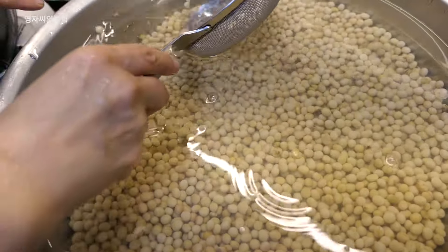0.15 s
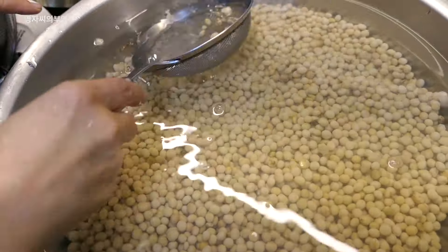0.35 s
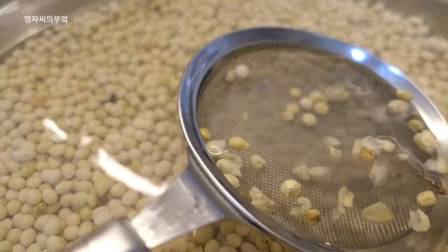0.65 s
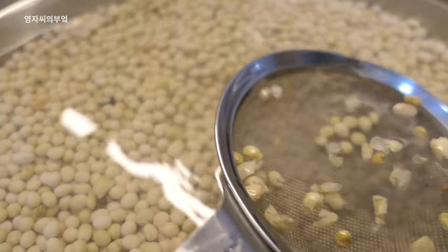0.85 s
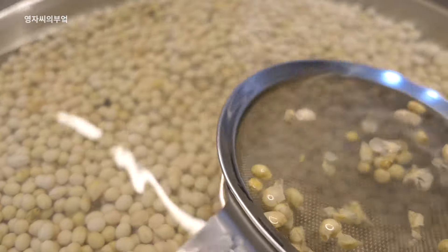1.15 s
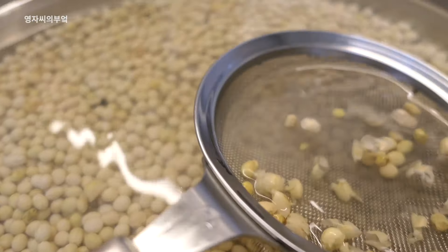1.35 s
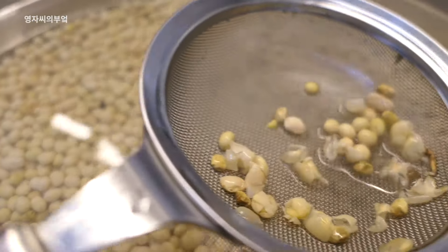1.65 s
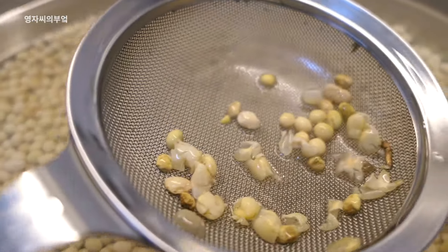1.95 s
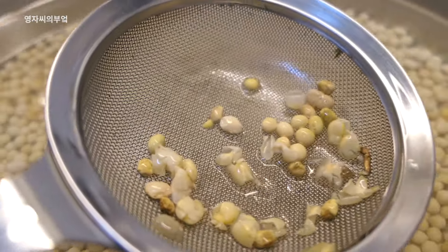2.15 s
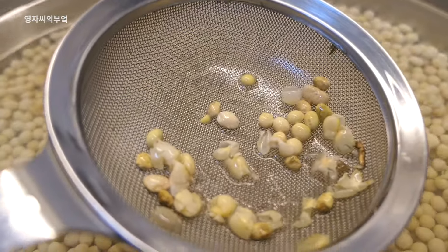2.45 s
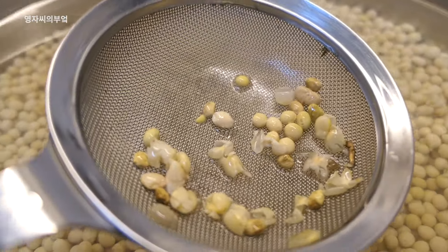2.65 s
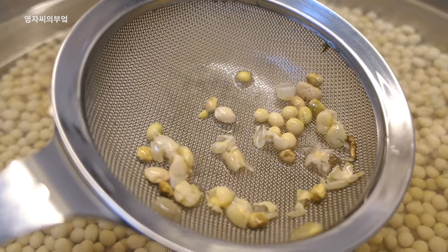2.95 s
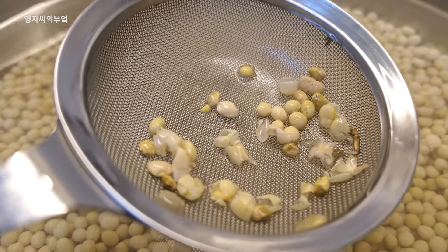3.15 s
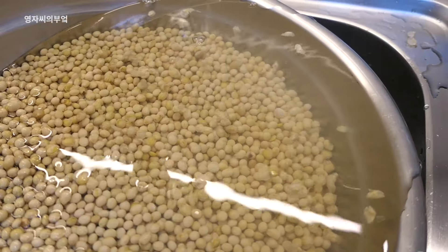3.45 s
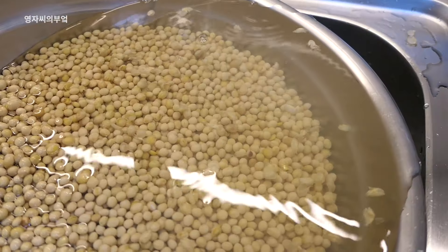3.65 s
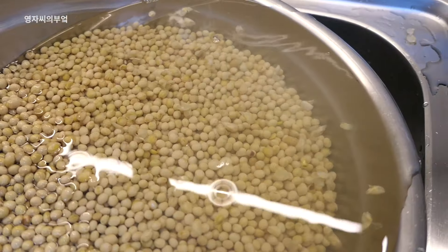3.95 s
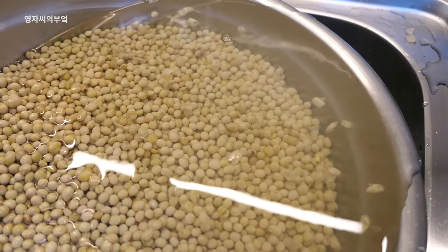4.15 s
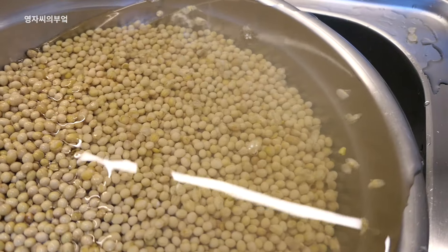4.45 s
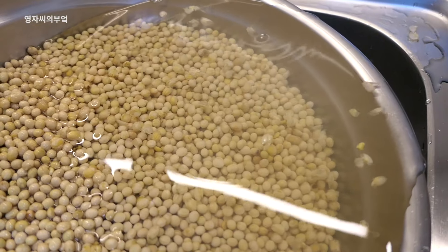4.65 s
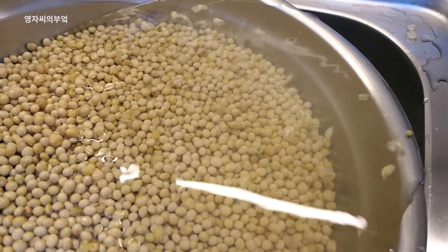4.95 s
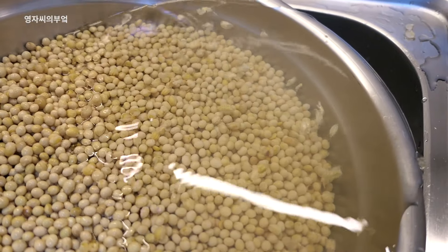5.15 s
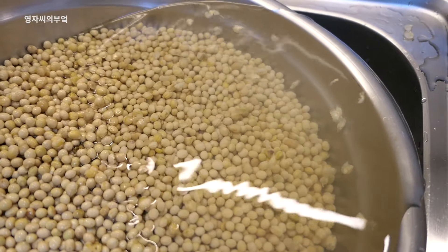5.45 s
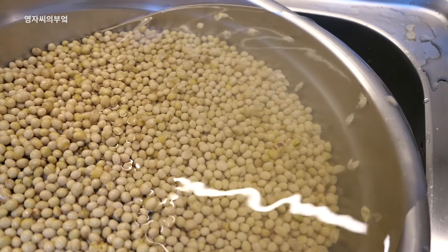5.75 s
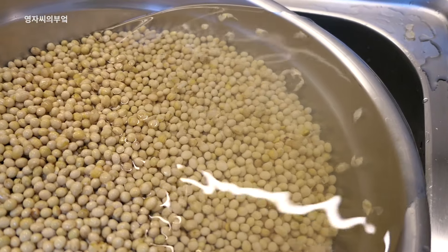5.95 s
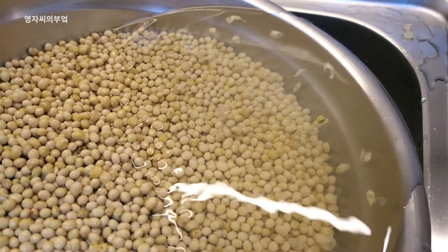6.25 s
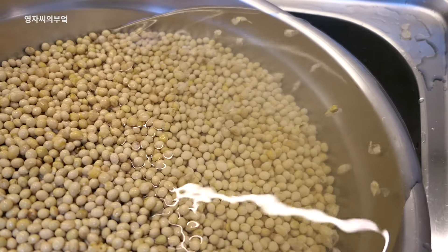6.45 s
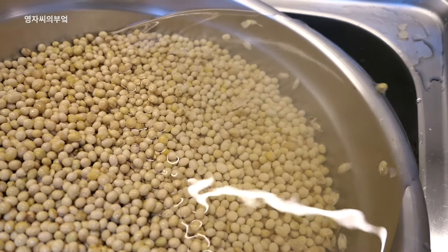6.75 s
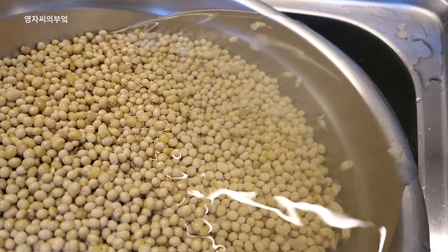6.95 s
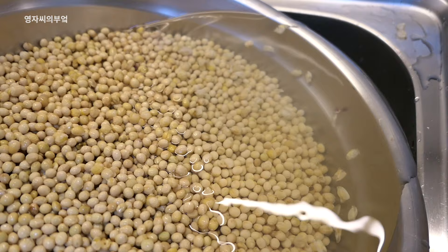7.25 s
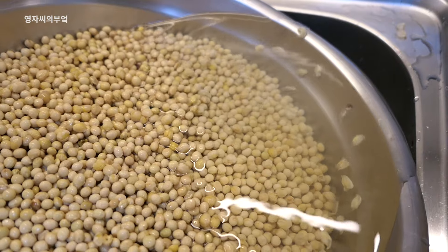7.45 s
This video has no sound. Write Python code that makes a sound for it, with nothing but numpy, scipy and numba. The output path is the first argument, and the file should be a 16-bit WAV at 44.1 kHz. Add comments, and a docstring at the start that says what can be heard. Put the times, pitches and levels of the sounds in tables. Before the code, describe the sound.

Quiet trickling and single drips come first, with an early clank of a strainer against a water-filled steel bowl and two muffled far-off slaps in the room. The sound cuts to silence for a moment, then a much louder tap stream starts abruptly, all bubbles, spray and hollow gurgle in the sink, with the bowl thrumming beneath. Close stereo microphone, soft kitchen air.

```python
"""Water trickles and drips as a wire strainer skims beans soaking in a steel bowl. Its rim clanks once on the
bowl, and two dull slaps sound further off in the kitchen. After a short silence, tap water runs into the bowl in
the sink: fizz, gurgles and large bubbles, coloured by the sink's hollow, with the steel drumming below.
Bubbles, drops and ringing steel are fading sine waves; hiss, slaps, drumming and room air are shaped noise."""
import sys
import numpy as np
from scipy import signal
from scipy.fft import rfft, irfft, next_fast_len
from scipy.io import wavfile
from scipy.ndimage import uniform_filter1d
from numba import njit

SR = 44100
rng = np.random.default_rng(int(sys.argv[2]) if len(sys.argv) > 2 else 0)


def to_linear_factor(level_db):
    """Convert decibel levels (scalar or array-like) to linear amplitude factors."""
    exponent = np.asarray(level_db, float) / 20
    return 10 ** exponent


def transcribe(u):
    """Save the signal u as a 16-bit wav file named by the first command-line argument.

    u: samples, shape (n,) or (channels, n), limited to [-1, 1]; the rate is SR.
    q: integer samples, one column per channel.
    """
    v = np.clip(np.atleast_2d(u).T, -1, 1)
    q = np.round(v * 32767).astype(np.int16)
    wavfile.write(sys.argv[1], SR, q)


N = 335406
TIME = np.arange(N) / SR  # seconds

# When the clank part ends, the skimming ends and the tap part begins [t/s]
CUTS = (.454, 3.320, 3.508)

# How hard the stream strikes the surface [t/s, fizz level/dB]
FLOW_LEVELS = [(3.51, -29.5), (4.03, -30), (4.18, -26), (4.28, -32), (4.42, -30.5), (4.55, -28.5),
               (5.1, -29), (5.28, -32), (5.42, -28.5), (5.62, -29.5), (5.86, -30.5), (6.0, -32), (6.3, -31),
               (6.7, -33), (6.98, -31.5), (7.18, -33.5), (7.33, -32.5), (7.61, -34)]
# Colour of the fizz and spray [f/Hz, gain/dB]
FIZZ_COLOUR = [(880, -13), (1500, -8), (1810, -13), (2100, -3.5), (2690, -7.5), (2910, -5), (9370, -10),
               (14800, -21.5), (16000, -23)]
# Bright spurts of spray [t/s, level against the steady spray/dB]
SPRAY_SPURTS = [(4.155, 5), (4.53, 7), (4.641, 6.2), (5.42, 13), (5.901, 4.5), (6.716, 8.6), (7.275, 17.5),
                (7.391, 13)]
SPURT_S = 0.019  # time to rise or fall by 20 dB
# Colour of the gurgles [f/Hz, gain/dB]
GURGLE_COLOUR = [(400, -56), (600, -14), (800, -3.5), (1050, -4.5), (2000, -4), (3000, -8), (4500, -11)]
# Deeper water turns fizz into gurgle until the level settles; the start is set against the fizz
GURGLE_START_DB, GURGLE_GAIN_DB_PER_S, SETTLED_S = -13.5, 6, 6.06
# Clearest large bubbles and plunges under the stream [t/s, relative level/dB, f/Hz]
LARGE_BUBBLES = [(3.552, -24, 4360), (3.608, -20, 2430), (3.772, -18, 2500), (3.821, -17.5, 1970),
                 (3.89, -14.5, 2030), (3.927, -12, 6300), (3.963, -14.5, 3340), (4.046, -18.5, 1110),
                 (4.18, -10.5, 3290), (4.391, -19, 1476), (4.445, -15.5, 6530), (4.483, -12.5, 5480),
                 (4.565, -14.5, 2250), (4.684, -13.5, 1350), (4.788, -16.5, 3200), (4.898, -9.5, 2106),
                 (5.01, -13.5, 1452), (5.065, -11.5, 2370), (5.135, -9.5, 2805), (5.208, -10.5, 1350),
                 (5.304, -13, 2040), (5.397, -11.5, 1890), (5.533, -15.5, 1266), (5.561, -12, 3490),
                 (5.603, -11, 2185), (5.63, -7, 1367), (5.72, -9, 3360), (5.739, -15, 844),
                 (5.81, -16, 900), (5.823, -14.5, 2540), (5.847, -10, 2120), (5.862, -8, 1302),
                 (5.971, -14.5, 890), (6.073, -11.5, 850), (6.194, -14.5, 2170), (6.339, -19.5, 1430),
                 (6.469, -13.5, 2410), (6.529, -14.5, 1590), (6.579, -11.5, 1397), (6.664, -16.5, 2500),
                 (6.835, -12, 1320), (6.945, -10, 2180), (6.989, -14.5, 3030), (7.044, -9, 1340),
                 (7.062, -17, 2485), (7.13, -13, 3470), (7.177, -16.5, 2156), (7.243, -16, 1350),
                 (7.366, -7.5, 2037), (7.549, -14.5, 2860)]
# Resonances of the air in the sink [f/Hz, width/Hz, gain/dB]
SINK_HOLLOW = [(850, 35, -3), (1350, 100, 3.5), (2070, 71, 2), (2523, 114, 1.5), (2860, 87, -1.5)]
# Resonances of the steel under the stream [f/Hz, width/Hz, gain/dB]
STEEL = [(285, 80, 6.5), (349, 13, 10), (425, 50, -5)]
# The steel drums harder as the bowl grows heavy
DRUM_START_DB, DRUM_GAIN_DB_PER_S = -41.5, 1.13
THRUM_START_DB, THRUM_GAIN_DB_PER_S = -56, 1.4
# Swells of the drumming [loudest t/s, level/dB, 20 dB rise/s, 20 dB fall/s]
DRUMMING_SWELLS = [(5.03, -35, 0.27, 0.17), (5.73, -31.5, 0.52, 0.24), (6.95, -31, 0.092, 0.085)]
# Swells of the low thrum [loudest t/s, level/dB, 20 dB rise/s, 20 dB fall/s]
LOW_THRUM_SWELLS = [(5.73, -48, 0.4, 0.31), (6.11, -39, 0.058, 0.15), (6.57, -36, 0.29, 0.81),
                    (6.95, -35.5, .1, 0.1), (7.52, -42.5, 0.81, 0.099)]
SMACK_DB, SMACK_T60_S = -15.5, 0.066  # a plunge's opening smack: level against its table row, 60 dB decay
KNOCK, KNOCK_T60_S = 2.1, 0.078  # a plunge's shove on the steel: extra drive at 0 dB, 60 dB decay

# Water running off the strainer as it tips or lifts [loudest t/s, level/dB, 20 dB rise/s, 20 dB fall/s]
STRAINER_RUNS = [(0, -47.5, 0.011, 0.11), (.155, -42.5, 0.0089, 0.018), (.257, -43, 0.0023, 0.16),
                 (.39, -41.5, 0.092, 0.062), (.45, -34.5, 0.16, .004), (.502, -45, 0.01, 0.16),
                 (.82, -43, 0.3, 0.33), (1.43, -42.5, 0.28, 0.28), (1.53, -45, 0.22, 0.084),
                 (1.625, -41, 0.072, 0.086)]
LAST_DREGS_DB = -70.5  # steady base under the runs
# Colour of the trickle [f/Hz, gain/dB]
TRICKLE_COLOUR = [(350, -51), (652, -16), (944, -19), (1570, -7), (3250, -4), (9760, -18), (14100, -28.5),
                  (16000, -42)]
# Single drops and ticks off the mesh [t/s, relative level/dB, f/Hz]
SINGLE_DRIPS = [(0.019, -33, 2800), (0.1135, -29.5, 8400), (0.1486, -22.5, 2480), (0.408, -24, 5960),
                (0.4973, -22, 3060), (0.5145, -25, 2700), (0.548, -28, 5350), (0.6993, -32, 2000),
                (0.857, -34, 2060), (0.8918, -28, 2030), (1.024, -35, 5300), (1.246, -24, 3350),
                (1.307, -26, 7800), (1.3623, -31, 3880), (1.608, -19, 4800), (1.631, -14.5, 3280),
                (1.677, -36, 6960), (1.959, -30, 2760), (2.9332, -22, 2320), (3.2805, -11.5, 5900)]

CLANK_S, CLANK_DB = .2735, -12.5  # moment, and level before each layer's trim
# Ringing modes of the bowl [f/Hz, relative level/dB, 60 dB ring time/s]
BOWL_MODES = [(242, -5, 0.26), (285.4, -1.5, 0.2), (363, -7, 0.41), (435, -6.5, 0.31), (654, -7, 0.37),
              (903, -11.5, 0.44), (1097, -6.5, 0.23), (1810, -5, 0.18), (1592, -5, .15), (3380, -11, 0.25),
              (4740, 7.5, 0.018)]
# Colour of the clank's crack [f/Hz, gain/dB]
CRACK_COLOUR = [(100, -49.5), (170, -17), (354, -9.5), (578, -35.5), (1760, -17.5), (2810, -17),
                (6510, -16.5), (7770, -28.5), (14800, -35), (16000, -50)]

# Far slaps [t/s, level/dB, rise/s, hold/s]
FAR_SLAPS = [(1.692, -26.5, 0.0082, 0.015), (2.034, -25.5, 0.026, 0.014)]
# Colour of the slaps [f/Hz, gain/dB]
SLAP_COLOUR = [(300, -37.5), (499, -11), (690, -14), (781, 0.5), (870, -6), (1910, -7.5), (3330, -21.5),
               (5900, -31.5), (12000, -53), (15600, -78)]
ROOM_T60_S = 0.45  # time the kitchen takes to fade by 60 dB

# Colour of the kitchen air [f/Hz, gain/dB]
AIR_COLOUR = [(30, -21.5), (64, -25), (157, 2), (259, -8.5), (355, -0.5), (437, -9.5), (889, -12.5),
              (1280, -18), (1910, -21.5), (3310, -28.5), (9970, -31.5), (14800, -43.5), (16000, -55)]
AIR_DB = -49.5  # before it swells


def tap():
    """The stream drags air under: fizz on top, gurgles in the sink's hollow, steel drumming below."""
    surge = to_linear_factor(0.73 * walk(30))
    large = large_bubbles()
    in_hollow = to_linear_factor(-7.5) * resonate(large, SINK_HOLLOW)
    water = fizz(surge) + gurgles(surge) + large + in_hollow + smacks()
    drum, thrum = steel_drumming()
    # the stream falls a little right, the steel sounds from the left
    placed = water * to_linear_factor([[-.4], [.4]]) + drum * to_linear_factor([[1.5], [-1.5]]) + thrum
    return above(placed, 74)


def flow_db():
    """Level of the fizz over time, following how hard the stream strikes."""
    t, db = np.transpose(FLOW_LEVELS)
    return np.interp(TIME, t, db)


def fizz(surge):
    """Clouds of small bubbles hiss together with the spray, rising and falling with the stream."""
    bubbles = swarm(320, count=10, last_s=.01, lo_hz=1802, hi_hz=14060, cycles=31.0, spread_db=3.5, wide=0.23)
    mixed = level(bubbles, 0) + spray()
    return level(colour(mixed, FIZZ_COLOUR), 0) * to_linear_factor(flow_db()) * surge


def spray():
    """Spatter is unsteady broad noise in short spurts, with fine droplets ticking as tiny rings."""
    side = colour(rng.standard_normal(N), [(3000, -9.5), (8000, -9), (14000, -5.0)])
    spatter = spread(rng.standard_normal(N), side) * to_linear_factor(2.0 * walk(45))
    spurts = [(t, db, SPURT_S, SPURT_S) for t, db in SPRAY_SPURTS]
    spatter = level(spatter, 0.36) * swells(spurts, 0)
    droplets = swarm(500, count=2, last_s=.002, lo_hz=1500, hi_hz=12000, cycles=1.5, spread_db=2.5, wide=0.4)
    return spatter + level(droplets, -6.5)


def gurgles(surge):
    """Clouds of deeper bubbles sound directly and through the resonant air of the sink."""
    bubbles = swarm(330, count=7, last_s=.018, lo_hz=445.0, hi_hz=4523, cycles=12.6, spread_db=3.0, wide=0.45)
    bubbles = colour(bubbles, GURGLE_COLOUR)
    deepening_s = np.minimum(TIME, SETTLED_S) - CUTS[2]
    db = flow_db() + GURGLE_START_DB + GURGLE_GAIN_DB_PER_S * deepening_s
    mixed = 0.74 * bubbles + resonate(bubbles, SINK_HOLLOW)
    return level(mixed, -0.93) * to_linear_factor(db) * surge


def large_bubbles():
    """Each plunge makes one large ringing bubble and a cloud of smaller ones, sliding down in pitch."""
    t, db, hz = np.transpose(LARGE_BUBBLES)
    start = ((t - .001) * SR).astype(np.int64)
    single = grains(start, hz, 0.024 + 50 / hz, to_linear_factor(db - 6.5), 0.986 + 0 * t, 0 * t, 2.2, N)
    return single + clouds(t, hz, to_linear_factor(db - 12), count=6, last_s=0.0066, wide=0.56, cycles=8.3, glide=0.88)


def smacks():
    """A sudden, fast-dying spurt of broad noise where each plunge breaks the surface."""
    t, db, _ = np.transpose(LARGE_BUBBLES)
    noise = spread(rng.standard_normal(N), 0.22 * rng.standard_normal(N))
    tone = [(500, -18), (1500, 3.0), (4000, 0.5), (8000, -10.0), (16000, -26.0)]
    return level(colour(noise, tone), 0) * kicks(t, db + SMACK_DB, SMACK_T60_S)


def steel_drumming():
    """The stream's uneven push and each plunge's shove drive the steel's resonances and a low thrum."""
    t, db, _ = np.transpose(LARGE_BUBBLES)
    push = spread(rng.standard_normal(N), 0.091 * rng.standard_normal(N)) * to_linear_factor(1.74 * walk(24))
    push = push * (0.5 + KNOCK * kicks(t, db, KNOCK_T60_S))
    running = TIME - CUTS[2]
    drum = level(resonate(resonate(push, [(294, 140, 0)]), STEEL), 0)
    drum = drum * swells(DRUMMING_SWELLS, DRUM_START_DB + DRUM_GAIN_DB_PER_S * running)
    thrum = level(resonate(resonate(push, [(173, 69, 0)]), [(145, 110, 0)]), 0)
    thrum = thrum * swells(LOW_THRUM_SWELLS, THRUM_START_DB + THRUM_GAIN_DB_PER_S * running)
    return drum, thrum


def trickle():
    """Tiny bubbles, a thin hiss and droplets drain through the mesh in runs."""
    bubbles = swarm(450, count=7, last_s=.018, lo_hz=900, hi_hz=11770, cycles=18, spread_db=3.0, wide=0.16)
    hiss = spread(rng.standard_normal(N), 0.17 * rng.standard_normal(N))
    mixed = level(bubbles, 0) + level(hiss, -2.5) + level(ticks(), -3.0)
    flow = swells(STRAINER_RUNS, LAST_DREGS_DB) * to_linear_factor(1.2 * walk(40.0))
    return level(colour(mixed, TRICKLE_COLOUR), 0) * flow


def ticks():
    """Fine droplets tick off the mesh as very short rings, a few much larger."""
    return swarm(130, count=3, last_s=0.002, lo_hz=1800, hi_hz=9000, cycles=2.5, spread_db=3.0, wide=0.24)


def drips():
    """Each drop is a short ring with a spatter of seven weaker ones."""
    t, db, hz = (np.repeat(c, 8) for c in np.transpose(SINGLE_DRIPS))
    u = rng.random((len(t), 3)).T
    first = np.arange(len(t)) % 8 == 0
    pitch = np.where(first, hz, 1200 * 7.8 ** u[0])
    size = to_linear_factor(db + np.where(first, -5, -6 - 9 * u[0]))
    late = np.where(first, 0, 0.003 * u[1] ** 2)
    start = ((t + late) * SR).astype(np.int64)
    ring_s = np.where(first, 18 / hz, .003)
    pan = 0.37 * (u[2] - .5)
    return grains(start, pitch, ring_s, size, 1.04 + 0 * t, pan, 0.44, N)


def clank():
    """The rim strikes the water-damped bowl: a crack, ringing modes and a slower boom of the sink."""
    hz, db, t60 = np.transpose(BOWL_MODES)
    start = np.full(len(hz), int(CLANK_S * SR))
    ring = grains(start, hz, t60, to_linear_factor(db + CLANK_DB - 12.0), 1 + 0 * hz, 0 * hz, 0.26, N)
    crack = to_linear_factor(CLANK_DB - 7.0) * burst(CLANK_S, 0.00035, 0.0033, 0.072, CRACK_COLOUR)
    thud = burst(CLANK_S, 0.011, 0.036, 0.12, [(100, -10.5), (600, -15.0), (900, -12.5)])
    boom = to_linear_factor(CLANK_DB - 0.5) * resonate(thud, STEEL)
    return ring + spread(crack[0] + boom[0], 0.25 * crack[1] + 0.17 * boom[1])


def slaps():
    """Far away, so each slap is noise that dies as slowly as the room's tail."""
    far = sum(to_linear_factor(db) * burst(t, rise, hold, ROOM_T60_S, SLAP_COLOUR) for t, db, rise, hold in FAR_SLAPS)
    dull = signal.lfilter([.25], [1, -.75], far)
    # the walls take the treble first
    bright = sum((TIME >= t) * 1000. ** (-np.maximum(TIME - t, 0) / 1.9) for t, *_ in FAR_SLAPS)
    mid, side = dull + (far - dull) * np.minimum(bright, 1)
    return spread(mid, .7 * side)


def kitchen():
    """Diffuse room rumble and hiss, unlike in the two ears, swelling a little."""
    air = level(colour(rng.standard_normal((2, N)), AIR_COLOUR), AIR_DB)
    return spread(air[0], 1.05 * air[1]) * to_linear_factor(.7 * walk(9))


def room(x, t60, wet_db):
    """Echoes add a decaying noise tail, different in each ear, duller as it fades."""
    t = np.arange(int(.6 * SR)) / SR
    tail = rng.standard_normal((2, len(t)))
    dull = signal.lfilter([.3], [1, -.7], tail)
    tail = dull + 0.24 * (tail - dull) * 1000. ** (-.5 * t / t60)
    tail = tail * 1000. ** (-t / t60) * np.minimum(t / 0.00083, 1)
    tail = tail / np.sqrt(np.sum(tail ** 2, axis=1)[:, None])
    return x + to_linear_factor(wet_db) * signal.oaconvolve(x, tail, axes=1)[:, :N]


@njit
def grains(start, hz, t60, size, glide, pan, rise, n):
    """Damped sines swell over rise cycles; over t60 they fall 60 dB and their pitch scales by glide."""
    out = np.zeros((2, n))
    for k in range(len(start)):
        length = int(t60[k] * SR) + 2
        fall, slide = 1000. ** (-1 / length), glide[k] ** (1 / length)
        a, w, p = size[k], 2 * np.pi * hz[k] / SR, 0.  # size, phase step, phase
        for i in range(start[k], min(start[k] + length, n)):
            p, w, a = p + w, min(w * slide, 2.8), a * fall
            v = a * np.sin(p) * min(p / (2 * np.pi * rise), 1.)
            out[0, i] += v * (1 + pan[k])
            out[1, i] += v * (1 - pan[k])
    return out


def clouds(t, hz, size, count, last_s, wide, cycles, glide):
    """Each plunge of air breaks into a cloud of bubbles close in time, pitch and place."""
    u = rng.random((len(t) * count, 4)).T
    pan = wide * (2 * rng.random(len(t)) - 1)
    t, hz, size, pan = (np.repeat(c, count) for c in (t, hz, size, pan))
    late = -last_s * np.log(1 - u[0])
    hz = hz * 1.3 ** (u[1] - .5)
    start = ((t + late) * SR).astype(np.int64)
    ring_s = 3 * cycles * (.5 + u[2]) / hz
    return grains(start, hz, ring_s, size * (0.64 + u[3]), glide + 0 * hz, pan, 0.68, N)


def swarm(plunges, count, last_s, lo_hz, hi_hz, cycles, spread_db, wide):
    """Clouds (plunges a second) at random moments and pitches; a few larger; equal power per Hz."""
    u = rng.random((int(plunges * N / SR), 3)).T
    hz = lo_hz * (hi_hz / lo_hz) ** u[1]
    size = to_linear_factor(-spread_db * np.log(1 - .99 * u[2])) * hz / hi_hz
    return clouds(u[0] * N / SR, hz, size, count, last_s, wide, cycles, 1.346)


def burst(s, rise, hold, t60, tone):
    """Coloured noise that rises, holds and dies away."""
    t = TIME - s
    shape = np.clip(t / rise, 0, 1) ** 2 * 1000. ** (-np.maximum(t - rise - hold, 0) / t60)
    return level(colour(rng.standard_normal((2, N)), tone), 0) * shape


def kicks(s, db, t60):
    """An envelope that jumps at each moment and dies away."""
    jumps = np.zeros(N)
    np.add.at(jumps, (s * SR).astype(np.int64), to_linear_factor(db))
    return signal.lfilter([1], [1, -1000. ** (-1 / (t60 * SR))], jumps)


def swells(rows, base_db):
    """Gain of a base plus swells that gain 20 dB over their rise and lose 20 dB over their fall."""
    power = to_linear_factor(base_db) ** 2
    for s, db, rise, fall in rows:
        away = np.where(TIME < s, (s - TIME) / rise, (TIME - s) / fall)
        power = power + to_linear_factor(db - 20 * away) ** 2
    return np.sqrt(power)


def walk(rate):
    """Random levels held 1 / rate s and slewed; spread near 1."""
    k = int(SR / rate)
    held = np.repeat(rng.standard_normal(N // k + 1), k)
    return 1.7 * uniform_filter1d(held, k)[:N]


def resonate(x, peaks):
    """Resonances as a sum of band-passes at (f/Hz, width/Hz, gain/dB)."""
    return sum(to_linear_factor(db) * signal.lfilter(*signal.iirpeak(hz, hz / width, SR), x) for hz, width, db in peaks)


def colour(x, tone):
    """Shape the spectrum by (f/Hz, gain/dB) points."""
    n = next_fast_len(x.shape[-1])
    hz, db = np.transpose(tone)
    bins_hz = np.arange(n // 2 + 1) * SR / n
    gain = to_linear_factor(np.interp(np.log(bins_hz + 1), np.log(hz), db))
    return irfft(rfft(x, n) * gain, n)[..., :x.shape[-1]]


def above(x, hz):
    """High-pass: small things do not radiate deep bass."""
    return signal.sosfilt(signal.butter(2, hz, "high", fs=SR, output="sos"), x)


def level(x, db):
    """Scale to an rms level."""
    return x * to_linear_factor(db) / np.sqrt(np.mean(x ** 2))


def spread(mid, side):
    """Left and right from mid and side."""
    return np.array([mid + side, mid - side])


def scene():
    """The clank stops at the first cut, skimming at the second; after silence the tap starts at the third."""
    # each cut fades within a few ms
    first, early, late = (np.clip(d / 0.0035, 0, 1) for d in (CUTS[0] - TIME, CUTS[1] - TIME, TIME - CUTS[2]))
    skim = room(trickle() + drips(), 0.04, -13) + slaps()
    strike = room(above(clank(), 100), ROOM_T60_S, -12.5)
    filling = room(tap(), 0.18, -11.5)
    return first * strike + early * skim + late * filling + (early + late) * kitchen()


def band_limit(x):
    """A steep low-pass at the top of the band."""
    return signal.sosfilt(signal.butter(12, 16630, fs=SR, output="sos"), x)


def record(dry):
    """The very top is cut, and the microphone drops the deep bass."""
    no_top = signal.sosfilt(signal.ellip(10, .5, 70, 15900, fs=SR, output="sos"), dry)
    mix = signal.sosfilt(signal.butter(2, 75, "high", fs=SR, output="sos"), no_top)
    return band_limit(mix)


dry = scene()
out = record(dry)
transcribe(out)
```